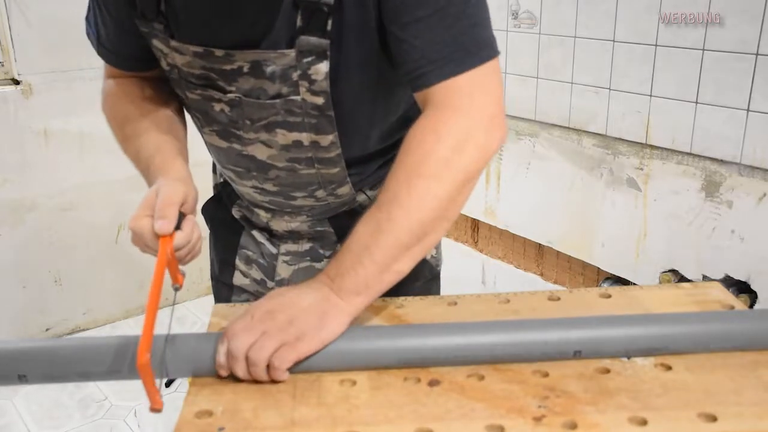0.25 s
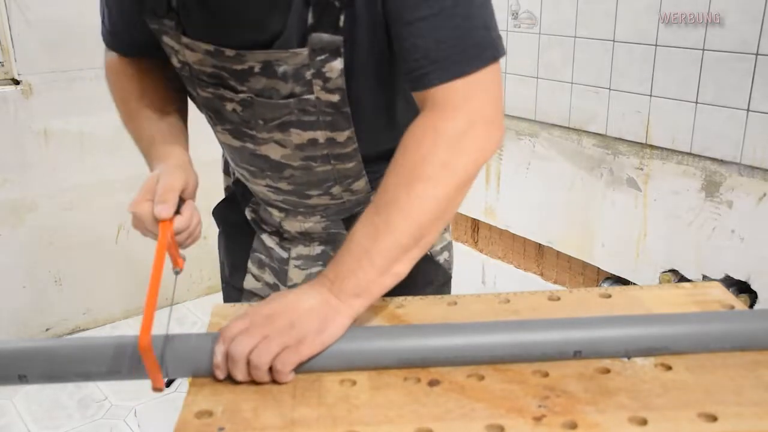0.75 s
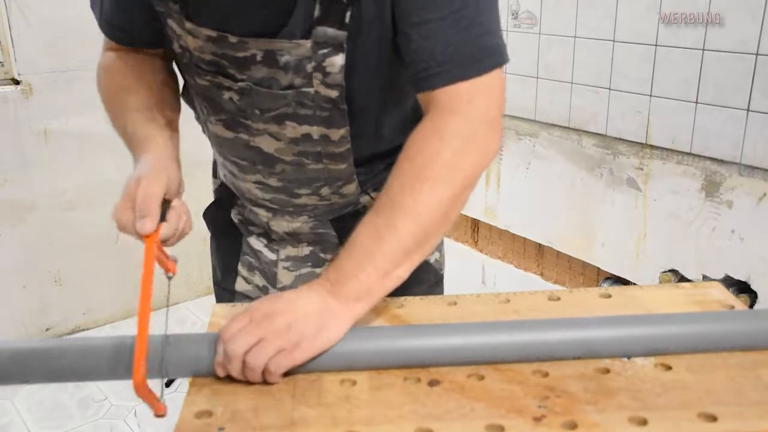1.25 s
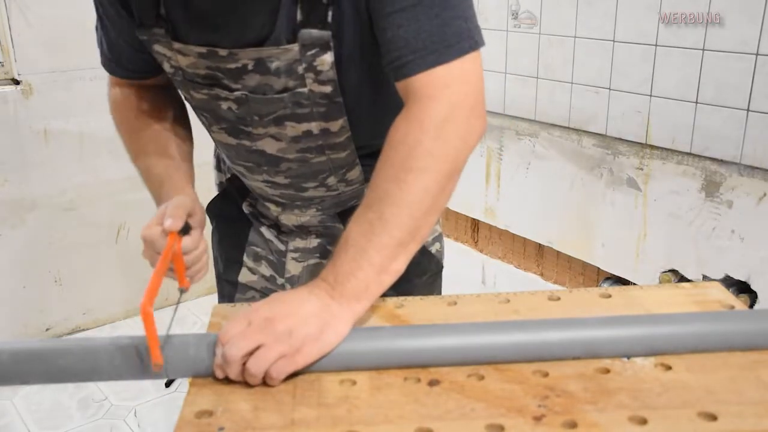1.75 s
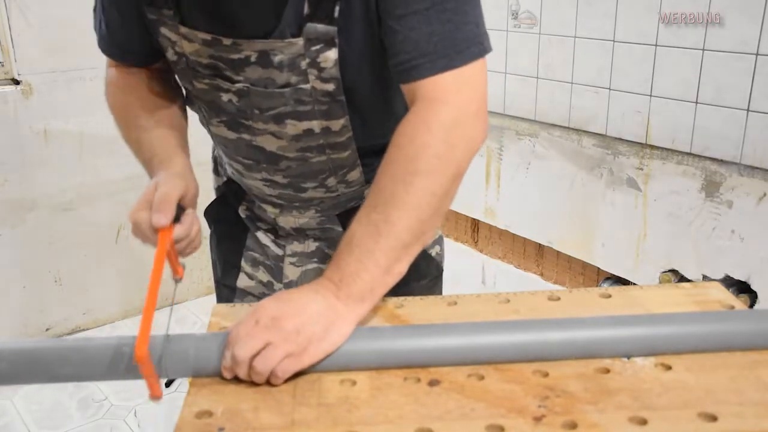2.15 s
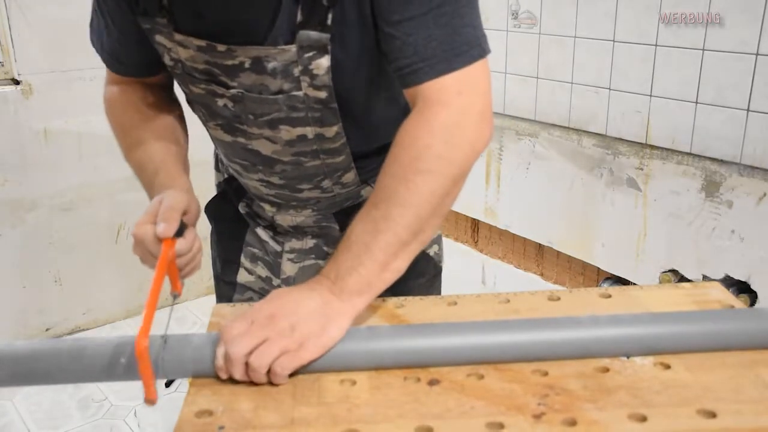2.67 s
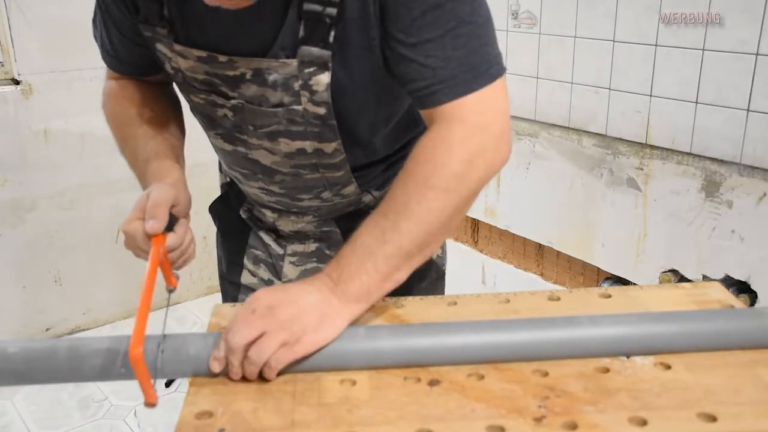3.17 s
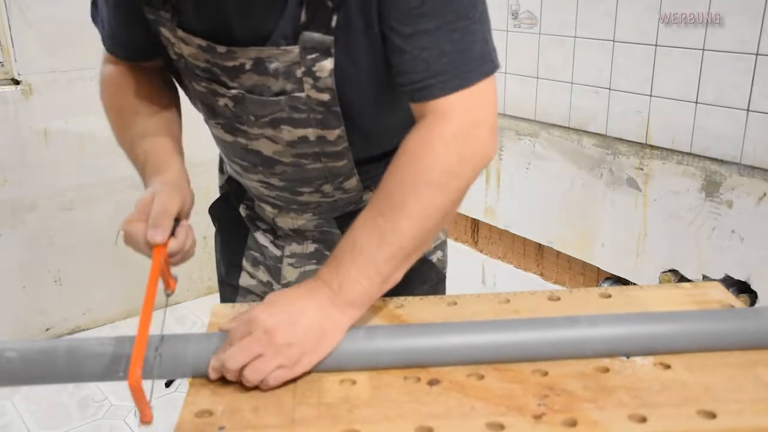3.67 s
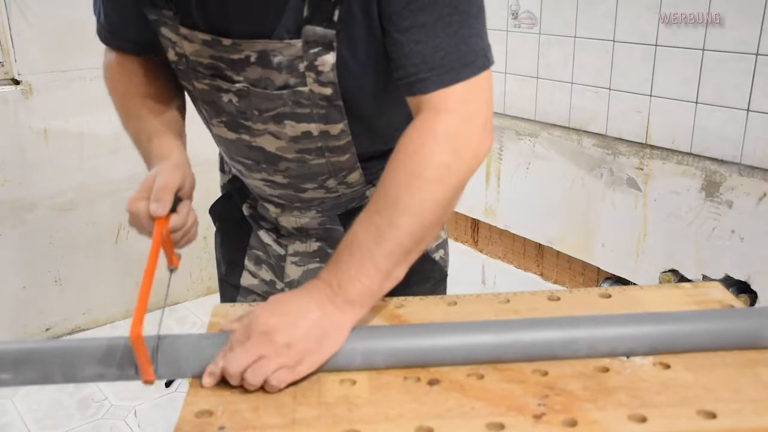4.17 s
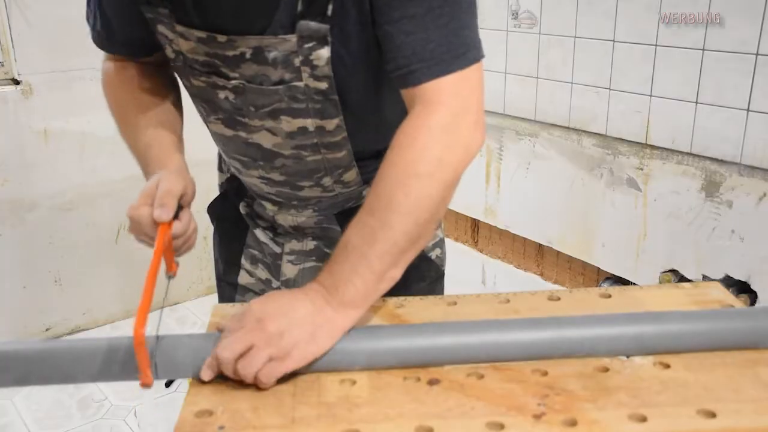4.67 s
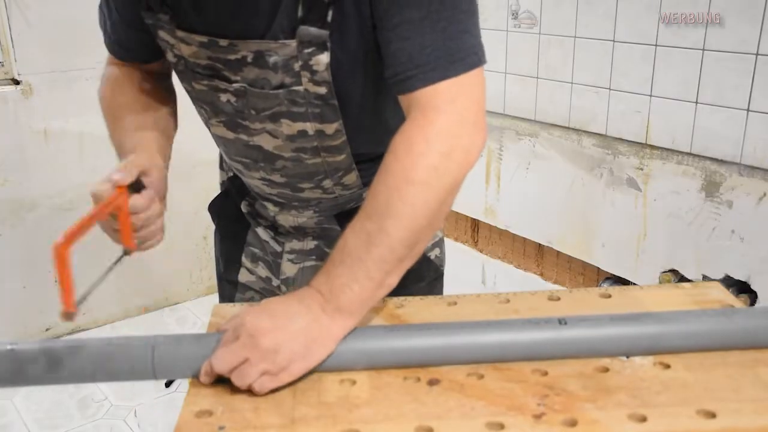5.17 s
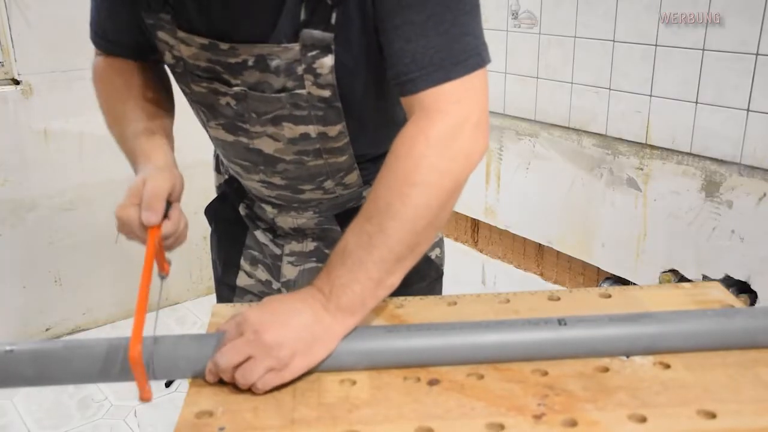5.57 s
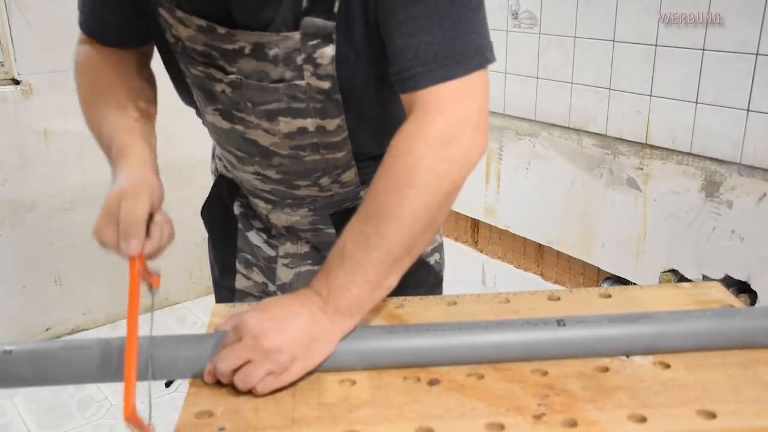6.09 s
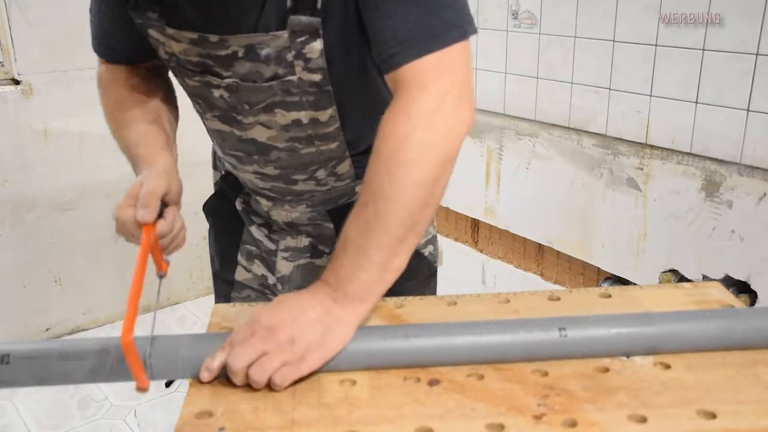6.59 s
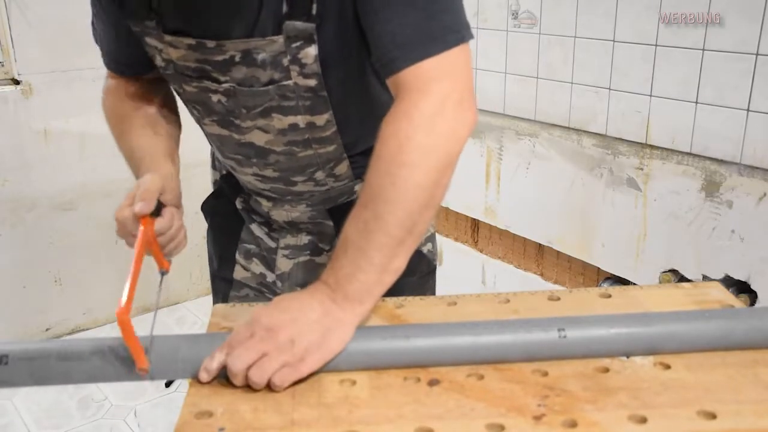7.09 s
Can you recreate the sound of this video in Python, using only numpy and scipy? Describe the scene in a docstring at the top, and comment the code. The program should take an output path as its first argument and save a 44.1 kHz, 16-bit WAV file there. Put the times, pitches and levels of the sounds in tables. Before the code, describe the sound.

A hand hacksaw rasps through a plastic pipe in short, uneven strokes, with light knocks against a wooden workbench.

```python
"""Hacksaw through a plastic drain pipe

Close up at a wooden workbench in a tiled room, a hand hacksaw rasps through a pipe held down on it.
The teeth tear off tiny chips that ring the pipe wall and the blade; the frame wobbles, so each stroke
flutters. Snagging teeth knock the pipe on the bench, the blade ticks and brushes in the slot at the
turns, the plastic squeaks, and the saw clatters out at the end. Faint air and hum lie behind it."""
import sys
import numpy as np
from scipy import signal
from scipy.fft import rfft, irfft
from scipy.io import wavfile

SR = 44100
rng = np.random.default_rng(int(sys.argv[2]) if len(sys.argv) > 2 else 0)


def log_audio(samples):
    """Write samples as a 16-bit WAV file to the path given in sys.argv[1]."""
    # one column per channel
    frames = np.atleast_2d(samples).T
    # limit to full scale, then quantise
    limited = np.clip(frames, -1, 1)
    pcm = np.round(limited * 32767).astype(np.int16)
    wavfile.write(sys.argv[1], SR, pcm)


N = 323694
TIME = np.arange(N) / SR
FREQ = np.maximum(np.arange(N // 2 + 1) * SR / N, 1)
TOP_HZ = 15850


def undb(db):
    """Decibels to gain."""
    return 10 ** (np.asarray(db) / 20)


def unit(x):
    """Scale to an rms of 1."""
    return x / np.sqrt(np.mean(x ** 2))


def contour(points):
    """Rows of (Hz, dB) as dB at every frequency."""
    hz, db = np.transpose(points)
    return np.interp(np.log(FREQ), np.log(hz), db)


def resonance(hz, width_hz):
    """Bell-shaped peak of height 1."""
    return 1 / (1 + (2 * (FREQ - hz) / width_hz) ** 2)


def minimum_phase(db):
    """Causal frequency response with this gain."""
    cepstrum = irfft(np.log(undb(db)), N)
    cepstrum[1:N // 2] *= 2
    cepstrum[N // 2 + 1:] = 0
    return np.exp(rfft(cepstrum))


def drift(rate):
    """Smooth random motion with an rms of 1, turning rate times a second."""
    return unit(np.interp(TIME * rate, np.arange(N // 10), rng.standard_normal(N // 10)))


# Still air in the room around the bench. Each row: frequency in Hz, relative level in dB.
ROOM_AIR = [(15, -16), (25, -10), (101, -47), (260, 7), (399, 8), (1080, 0), (1200, 10), (1450, -10),
            (1950, 0), (15500, -11.5)]
# A machine, faint in the background. Each row: frequency in Hz, rms level in dB.
MACHINE_HUM = [(398.4, -78.5), (1200, -84)]


def room_tone(air_db):
    """Quiet workshop air and a steady machine hum."""
    air = unit(irfft(rfft(rng.standard_normal(N)) * undb(contour(ROOM_AIR)), N))
    hum = sum(undb(db) * np.sqrt(2) * np.sin(2 * np.pi * hz * TIME) for hz, db in MACHINE_HUM)
    return undb(air_db) * air + hum


# The blade resting in the slot between strokes: drive in dB on bench, pipe wall and blade.
RESTING_DRIVE_DB = (-87, -76, -86)
# Saw strokes, close to the microphone. Each row: first bite, end, run-up and run-out in seconds;
# rasp drive, its growth along the stroke, bench thrum offset, pipe wall offset, pipe squeak emphasis
# and blade ring emphasis in dB; frame wobble in Hz at the start, middle and end.
SAW_STROKES = [(0.010, 0.229, 0.083, 0.059, -41, -1, -5.5, -6.5, -3.7, 1, 26.6, 27, 26),
               (0.632, 1.11, 0.063, 0.033, -42.5, 3, -5, -4.5, -0.5, -1, 25.2, 24, 27),
               (1.414, 1.691, 0.07, 0.09, -42, 3.5, -2.5, -2.9, 2, -2, 29.7, 29.8, 31),
               (1.785, 1.871, 0.12, 0.12, -39, 0.5, -8, -6.5, -2.8, 5.0, 29.6, 25, 27.8),
               (2.225, 2.557, 0.12, 0.11, -40, -1, -7, -4.5, -2, 3, 25.3, 28.6, 25.4),
               (2.698, 3.08, 0.086, 0.027, -41, 1.5, -4, -5.5, -1, 0, 28.3, 30.3, 27.5),
               (3.396, 3.964, .18, 0.02, -39, 2, -6.8, -5.5, 3.5, -4.5, 27.94, 28.2, 30.2),
               (4.036, 4.378, 0.074, 0.06, -38, -2, -7, -7, -1, -4.5, 30.3, 27, 29.4),
               (4.487, 4.716, 0.09, 0.068, -39, 3, -7, -6.5, -1.8, -1, 29.3, 30.5, 28),
               (4.816, 4.978, 0.057, 0.041, -38, 4, -7, -7.5, 0, 0, 26, 29.4, 27),
               (5.075, 5.219, .11, 0.033, -37.5, 2.5, -7.5, -8, -2, -2, 28.2, 27.8, 23.6),
               (5.411, 5.881, 0.046, 0.05, -37, 1, -7, -8, -2, 1, 25.54, 27, 30.6),
               (5.976, 6.389, 0.28, 0.15, -37, 2.5, -7, -4.3, 5.5, 2.5, 28.5, 28, 28.6),
               (6.62, 7.151, .11, 0.041, -37, 0, -7.5, -8.5, 1.5, 1, 26.65, 25, 19.5)]


def strokes(thrum_power=1.01, wall_power=1.32, rasp_power=2.03):
    """Drive on bench, wall and blade grows as powers of speed, the rasp fastest: a slow blade is dull."""
    drive = np.outer(undb(RESTING_DRIVE_DB), np.ones(N))
    for start, end, run_up, run_out, db, growth_db, thrum_db, wall_db, *_ in SAW_STROKES:
        speed = np.interp(TIME, [start - run_up, start, end, end + run_out], [0, 1, 1, 0])
        along = np.interp(TIME, [start, end], [-.5, .5])
        thrum = undb(thrum_db) * speed ** thrum_power
        wall = undb(wall_db) * speed ** wall_power
        rasp = undb(growth_db * along) * speed ** rasp_power
        drive = np.maximum(drive, undb(db) * np.array([thrum, wall, rasp]))
    return drive


def frame_wobble(lean_db=1.8, bite_db=3):
    """The swaying frame presses the blade on each side of the slot: two bites a cycle, one harder."""
    flutter_db = np.zeros(N)
    for start, end, run_up, run_out, *_, start_hz, middle_hz, end_hz in SAW_STROKES:
        wobble_hz = np.interp(TIME, [start, (start + end) / 2, end], [start_hz, middle_hz, end_hz])
        cycles = np.cumsum(wobble_hz) / SR
        angle = 2 * np.pi * (cycles - np.interp(start, TIME, cycles))
        speed = np.interp(TIME, [start - run_up, start, end, end + run_out], [0, 1, 1, 0])
        flutter_db += speed * (lean_db * np.cos(angle) + bite_db * np.cos(2 * angle))
    return flutter_db


def teeth(tooth_hz, jitter, slip_cycles):
    """Each tooth loads up and lets go: a sharp rise of force that decays over its cycle."""
    depth_db = .8 * drift(80) + 1.2 * drift(300)  # no two teeth sink in equally far
    phase = np.cumsum(tooth_hz * np.exp(jitter * drift(90))) / SR % 1
    return unit(np.exp(-phase / slip_cycles)) * undb(depth_db)


def chips(per_second, spread_db):
    """Chips tear off as clicks of uneven size at random moments."""
    clicks = (rng.random(N) < per_second / SR) * np.sign(rng.standard_normal(N))
    return unit(clicks * undb(spread_db * rng.standard_normal(N)))


def sliding_cut(force, swell_db, flicker_db, bands=16):
    """The cut slides along the blade, so neighbouring groups of modes swell and fade."""
    spectrum, place = rfft(force), FREQ / TOP_HZ * bands
    shifting = 0
    for k in range(bands + 1):
        band = irfft(spectrum * np.maximum(1 - np.abs(place - k), 0), N)
        shifting += band * undb(swell_db * drift(5.7) + flicker_db * drift(50))
    return unit(shifting)


def rasp_colour(force, drive_db):
    """Pushing favours a squeak of the pipe, pulling the ring of the taut blade."""
    squeak_db, blade_db = np.zeros((2, N))
    turn = 0
    for _, end, *_, squeak, blade, _, _, _ in SAW_STROKES:
        squeak_db[TIME >= turn], blade_db[TIME >= turn] = squeak, blade
        turn = end
    sizzle_db = np.clip(.5 * (drive_db + 38), -3, 1)  # a harder stroke sizzles more
    scuff_db = np.clip(.65 * (-38.5 - drive_db), 0, 11)  # a slow blade scuffs instead of cutting
    rasp = force
    for db, hz, width_hz in ((squeak_db - 2, 4560, 640), (blade_db, 6320, 570),
                             (sizzle_db, 10800, 2600), (scuff_db, 3250, 1550)):
        band = irfft(rfft(force) * resonance(hz, width_hz), N)
        rasp = rasp + (undb(db + .5 * drift(34)) - 1) * band
    return rasp


def sawing(drive, gain_db):
    """The teeth tear chips in bursts as the frame sways: forces on bench, pipe wall and blade."""
    flutter_db = frame_wobble()
    tearing = teeth(tooth_hz=230.4, jitter=.4, slip_cycles=.92) * chips(per_second=24000, spread_db=2.55)
    force = sliding_cut(tearing, swell_db=.16, flicker_db=.93)
    rasp = rasp_colour(force, drive_db=20 * np.log10(drive[2]))
    rasp = unit(rasp * undb(1.1 * flutter_db))
    # the heavy bench follows the flutter far less than the light blade, and bumps unevenly
    bench_db = .4 * flutter_db + 1.7 * drift(110) + 1.2 * drift(35)
    thrum = undb(-1.1) * unit(force * undb(bench_db))
    wall = undb(-1.7) * unit(force * undb(.81 * flutter_db))
    return undb(gain_db) * drive * np.array([thrum, wall, rasp])


# Broad colour of the sawn pipe from close by. Each row: frequency in Hz, relative level in dB.
PIPE_COLOUR = [(60.0, -43.0), (90.0, -30.2), (130.0, -14.7), (190.0, -4.3), (300.0, 0.0), (650.0, -6.4),
               (1300.0, -10.6), (2200.0, -14.1), (3000.0, -13.2), (5500.0, -15.1), (8800.0, -14.8),
               (11000.0, -14.8), (14000.0, -13.1), (15600.0, -20.2)]
# Resonances of pipe, blade and frame. Each row: frequency in Hz, width in Hz, lift in dB.
PIPE_AND_SAW_MODES = [(1702.0, 215.0, 11.0), (2051.0, 171.0, 6.7), (2278.0, 209.0, 5.9),
                      (4500.0, 147.0, 8.7), (4704.0, 25.0, 7.4), (5001.0, 151.0, 4.2), (5224.0, 37.0, 5.0),
                      (5615.0, 154.0, 5.0), (6253.0, 600.0, 6.2), (6705.0, 170.0, 5.9),
                      (7336.0, 184.0, 3.5), (7508.0, 66.0, 7.3), (8430.0, 266.0, 4.6), (9317.0, 53.0, 5.2),
                      (9721.0, 299.0, 8.2), (10050.0, 67.0, 7.1), (10238.0, 179.0, 9.1),
                      (10440.0, 44.0, 5.6), (10649.0, 203.0, 5.6), (10789.0, 63.0, 6.7),
                      (11222.0, 277.0, 4.5), (12112.0, 600.0, 9.7), (12742.0, 92.0, 4.3),
                      (13197.0, 374.0, 4.7), (13659.0, 89.0, 4.2), (14456.0, 600.0, 4.3),
                      (14862.0, 74.0, 5.2), (15490.0, 158.0, 7.6)]


def pipe_and_saw(forces):
    """Three forces sound three ranges: low thrum of the bench, ring of the wall, high rasp of the blade."""
    modes_db = sum(db * resonance(hz, width_hz) for hz, width_hz, db in PIPE_AND_SAW_MODES)
    response = minimum_phase(contour(PIPE_COLOUR) + modes_db)
    low = np.interp(FREQ, [700, 1600], [1, 0])
    high = np.interp(FREQ, [2300, 3800], [0, 1])
    ranges_hz = [(150, 900), (1400, 2500), (3000, 15500)]
    spectrum = 0
    for force, share, (lo, hi) in zip(forces, (low, 1 - low - high, high), ranges_hz):
        # a unit force gives about a unit level within its range
        power = np.mean(np.abs(response) ** 2 * (FREQ > lo) * (FREQ < hi))
        spectrum += rfft(force) * share / np.sqrt(power)
    return irfft(spectrum * response, N)


def impact(start, t60, snap):
    """A sharp first contact, then a short rattle that dies away."""
    t = TIME[:SR // 4]
    rattle = undb(-60 * t / t60) * rng.standard_normal(len(t))
    rattle[0] = -snap
    return np.concatenate([np.zeros(int(start * SR)), rattle, np.zeros(N)])[:N]


# The pipe knocking on the wooden bench, close by.
# Each row: start in seconds, relative level in dB, offset of the ring in dB.
PIPE_KNOCKS = [(0.037, -22.5, -5), (0.229, -21, -2.5), (0.64, -22, -12), (1.129, -29.5, -1.5),
               (1.184, -32, -27), (2.38, -30, -27), (2.653, -28.5, -15), (2.786, -17, -31),
               (2.819, -28, -22), (2.855, -24, -22), (3.146, -25, -29), (3.182, -25.5, -25),
               (3.224, -34, -9), (3.372, -23.5, -7), (3.439, -23, -15), (3.668, -21, -27),
               (4.4, -18.5, -30), (4.989, -23, -29), (5.174, -19, -13), (5.703, -21, -8),
               (5.764, -17.5, -21), (5.958, -13, -26), (5.998, -19.5, -21), (6.17, -14, -31),
               (6.2, -23, -31), (6.433, -21, -31), (7.209, -33.5, -25), (7.271, -31.5, -8)]


def pipe_knocks(thrum_db, wall_db, rasp_db):
    """A tooth snags, the pipe jumps and lands; a landing that rings more has a sharper first contact."""
    forces = 0
    for start, db, ring_db in PIPE_KNOCKS:
        bump = impact(start, t60=.033, snap=3 + 12 * min(undb(ring_db), 1))
        gains = undb(db) * undb([thrum_db, ring_db + wall_db, ring_db + rasp_db])
        forces += np.outer(gains, bump)
    return forces


# The blade ticking in the slot, close by.
# Each row: start in seconds, relative level in dB, offset of the pipe wall's ring in dB.
BLADE_TICKS = [(0.2575, -30.5, -4), (0.263, -28, -5.5), (0.386, -42.5, -3), (0.403, -43.5, -9),
               (0.56, -63, 14), (0.625, -46, 3), (0.669, -46, 9), (1.1545, -45, -4), (1.2486, -63, 3),
               (1.352, -49.5, -3), (1.99, -47.5, -14), (2.147, -42.5, -0.5), (2.369, -37, -15),
               (2.974, -34, -12), (3.138, -44.5, -2), (4.275, -43, -15), (4.313, -54, -3),
               (4.427, -47.5, -10), (4.796, -37, -21), (5.3103, -54.5, -21), (5.384, -46, -6),
               (6.5146, -36.5, -2), (6.694, -30, -5), (7.215, -49, -3), (7.281, -55, -12)]


def blade_ticks(thrum_db, wall_db):
    """The slack blade slaps the side of the slot."""
    forces = 0
    for start, db, ring_db in BLADE_TICKS:
        gains = undb(db) * undb([thrum_db, ring_db + wall_db, 0])
        forces += np.outer(gains, impact(start, t60=.035, snap=1.5))
    return forces


# Light touches in the slot at the turns.
# Each row: loudest moment in seconds, rasp drive in dB, offset for bench and pipe wall in dB.
BLADE_BRUSHES = [(0.275, -44, -1), (0.299, -45.5, -6), (0.345, -53, -0.5), (0.395, -63, -2), (0.56, -64, 6),
                 (1.109, -43, 2.5), (1.163, -46, -7.5), (1.19, -57.5, 1), (1.352, -53.5, 4),
                 (1.955, -56, 8.5), (2.15, -48, -9), (2.675, -52, 2), (3.157, -39, -6), (3.21, -65.5, 12.5),
                 (3.12, -55, 2), (3.28, -54, 3), (3.3, -56, 5), (3.336, -43, 5), (3.997, -47.5, 0.5),
                 (4.445, -51, 4), (4.765, -59, 3), (5.257, -56, 2.5), (5.335, -67.5, 4.5),
                 (6.515, -50.5, -7), (6.591, -43, 6.5), (7.195, -54.5, -4), (7.255, -47.5, 1),
                 (7.29, -48, -3.5)]


def blade_brushes(rise_s=.012, fade_s=.013):
    """The unloaded blade brushes the slot: the drive on bench, wall and blade swells and fades."""
    drive = np.zeros((3, N))
    for peak, db, body_db in BLADE_BRUSHES:
        near = np.abs(TIME - peak) < 10 * fade_s
        t = TIME[near] - peak
        touch = np.exp(np.minimum(t / rise_s, -t / fade_s))
        gains = undb([db + body_db, db + body_db, db])
        drive[:, near] = np.maximum(drive[:, near], np.outer(gains, touch))
    return drive


# Brief squeaks at the cut, close by.
# Each row: middle in seconds, pitch in Hz, relative level in dB, length in seconds.
PLASTIC_SQUEAKS = [(0.898, 2000, -27, 0.0072), (1.165, 1710, -32.5, 0.0095), (1.477, 1650, -26.5, 0.0066),
                   (1.59, 2290, -33, 0.027), (2.15, 2014, -33, 0.0068), (2.341, 1730, -24, 0.01),
                   (3.577, 1900, -25, 0.016), (3.616, 1987, -25.5, 0.01), (5.829, 1754, -32, 0.019),
                   (6.153, 1664, -24, 0.0068), (6.212, 1728, -38, 0.032), (6.329, 2050, -22, 0.0098),
                   (6.622, 1717, -25, 0.015)]


def plastic_squeaks(gain_db, waver):
    """The plastic grips the blade, and its sticking and slipping locks onto one mode of the pipe wall."""
    wavering_time = np.cumsum(1 + waver * drift(250)) / SR
    sound = np.zeros(N)
    for middle, hz, db, length in PLASTIC_SQUEAKS:
        near = np.abs(TIME - middle) < 3 * length
        swell = np.exp(-2 * ((TIME[near] - middle) / length) ** 2)
        sound[near] += undb(db) * swell * np.sqrt(2) * np.sin(2 * np.pi * hz * wavering_time[near])
    return undb(gain_db) * sound


def tiled_room(direct, t60, wet_db):
    """The tiled walls add a dense tail of reflections."""
    t = TIME[:SR // 2]
    tail = rng.standard_normal(len(t)) * undb(-60 * t / t60)
    return direct + undb(wet_db) * signal.fftconvolve(direct, tail / np.linalg.norm(tail))[:N]


def scene():
    """One microphone close to the work; the tiled walls answer faintly."""
    drive = np.maximum(strokes(), blade_brushes())
    forces = sawing(drive, gain_db=-4)
    forces += blade_ticks(thrum_db=-8, wall_db=-4.5)
    forces += pipe_knocks(thrum_db=-15.5, wall_db=-13.5, rasp_db=-19)
    work = pipe_and_saw(forces) + plastic_squeaks(gain_db=-15.5, waver=.026)
    return (tiled_room(work, t60=.2, wet_db=-32.5) + room_tone(air_db=-69.5))[None]


def record(dry):
    """The recorder cuts the top of the treble steeply."""
    return signal.sosfilt(signal.ellip(12, .1, 80, TOP_HZ, fs=SR, output="sos"), dry)


dry = scene()
out = record(dry)
log_audio(out)
```